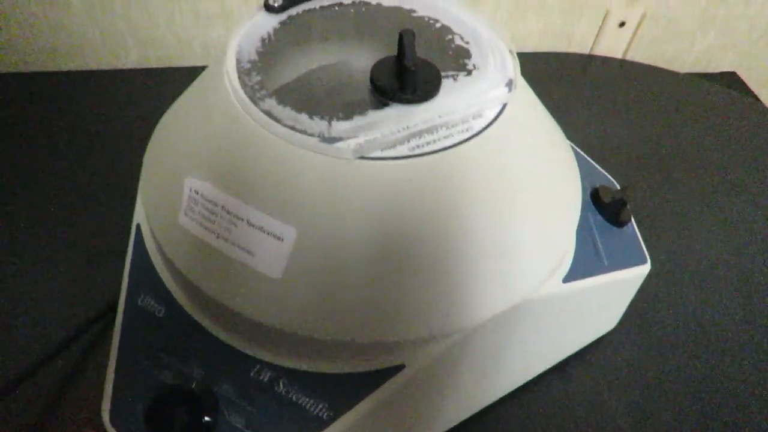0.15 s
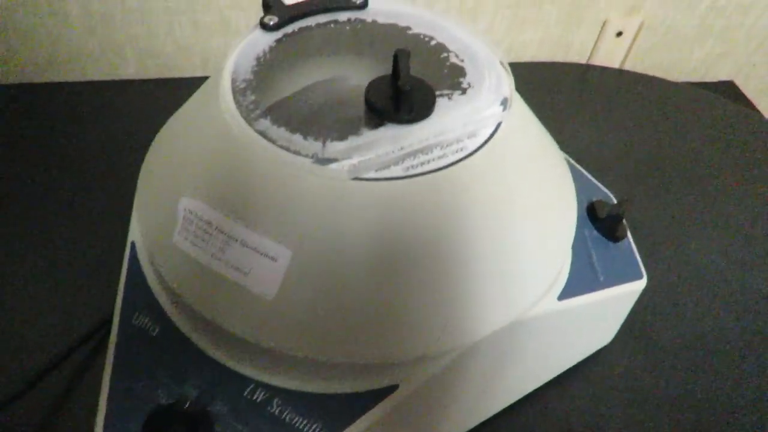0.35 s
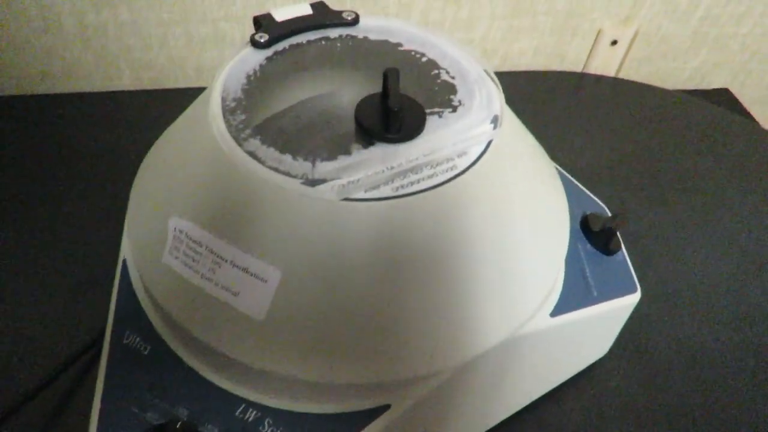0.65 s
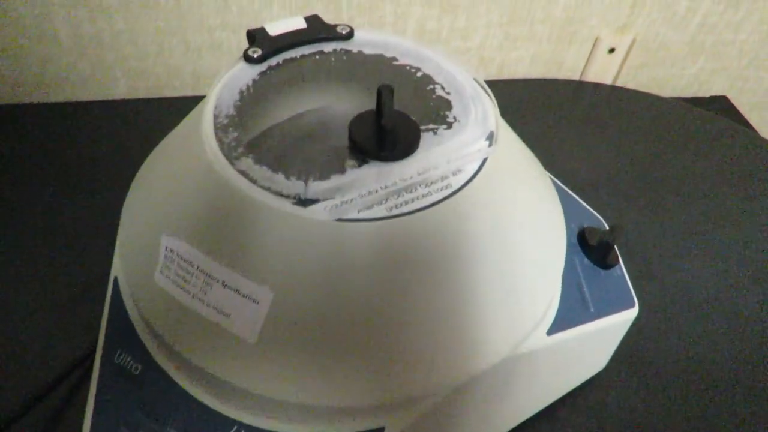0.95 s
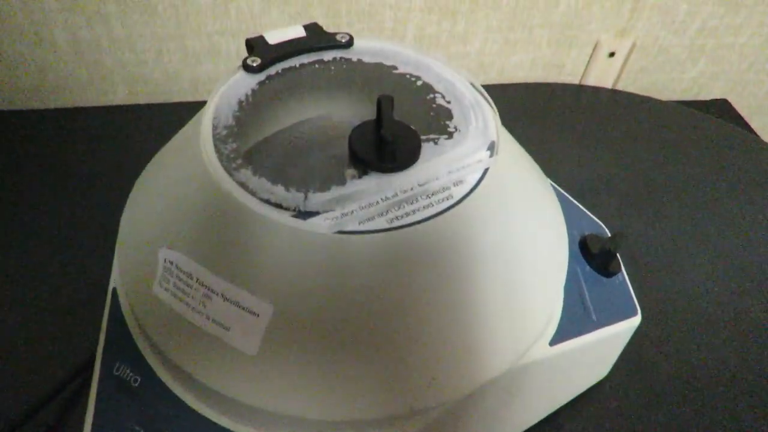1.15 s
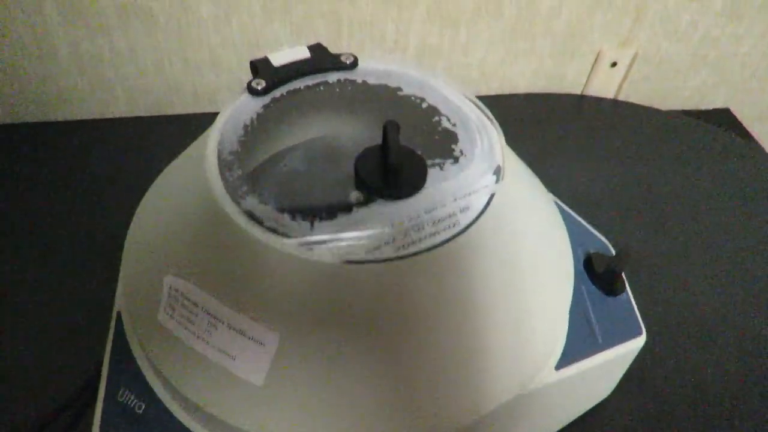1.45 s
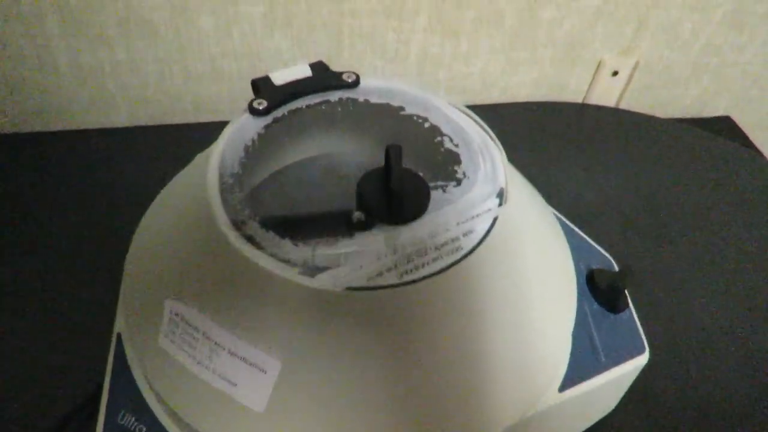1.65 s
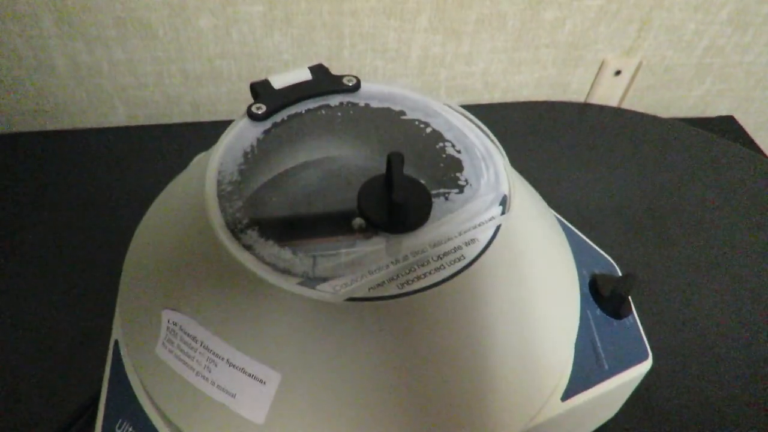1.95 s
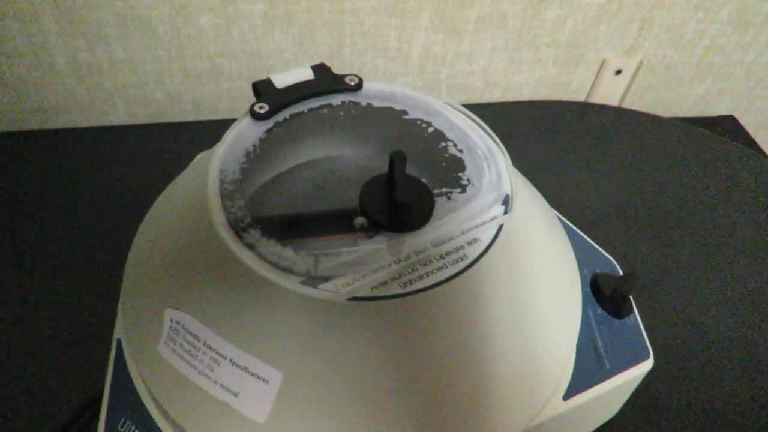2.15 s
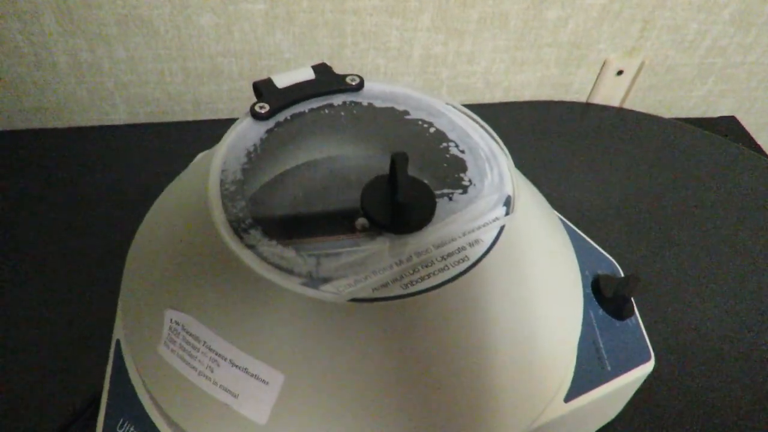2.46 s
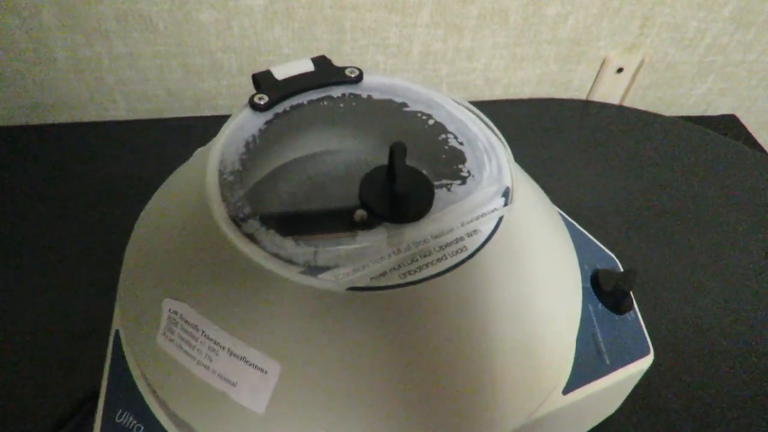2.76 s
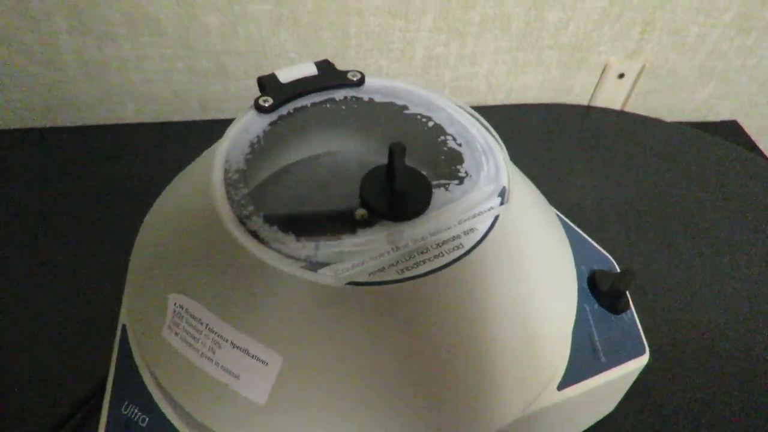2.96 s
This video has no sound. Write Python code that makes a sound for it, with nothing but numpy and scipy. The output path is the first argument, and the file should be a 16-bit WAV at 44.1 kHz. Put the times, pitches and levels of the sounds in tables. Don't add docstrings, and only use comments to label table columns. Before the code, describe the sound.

Steady low motor hum and rushing air from a lab centrifuge, with faint ticks and taps.

```python
import sys
import numpy as np
from scipy import signal
from scipy.fft import rfft, irfft
from scipy.io import wavfile
from scipy.ndimage import uniform_filter1d

SR = 44100
rng = np.random.default_rng(int(sys.argv[2]) if len(sys.argv) > 2 else 0)


def unload_audio(sound):
    columns = np.transpose(np.atleast_2d(sound))
    steps = np.round(np.clip(columns, -1, 1) * 32767)
    wavfile.write(sys.argv[1], SR, steps.astype(np.int16))


def elevation(decibels):
    levels = np.asarray(decibels, float)
    return 10 ** (levels / 20)


N = 136710


def evened(x):
    return x / np.sqrt(np.mean(x ** 2) + 1e-20)


def read_curve(points, hz):
    f, value = np.transpose(points)
    return np.interp(np.log(hz + 1), np.log(f + 1), value)


def band(x, low_hz, high_hz):
    return signal.sosfilt(signal.butter(2, [low_hz, high_hz], "band", fs=SR, output="sos"), x)


def add(mix, start_s, sound):
    part = mix[:, round(start_s * SR):][:, :sound.shape[1]]
    part += sound[:, :part.shape[1]]


def wander(top_hz):
    t = np.arange(0, N + 200, 200) / SR
    slow = 0
    for f in np.geomspace(top_hz / 20, top_hz, 16):
        slow = slow + np.sin(2 * np.pi * (f * t + rng.random())) / np.sqrt(f)
    return np.interp(np.arange(N) / SR, t, evened(slow))


def ringing(modes, spread_db, rise_s):
    t = np.arange(3500) / SR
    hz, db, t60_s = np.transpose(modes)[:, :, None]
    level_luck, pitch_luck, phase_luck = rng.standard_normal((3, len(modes), 1))
    decay = elevation(db + spread_db * level_luck - 60 * t / t60_s) * np.minimum(t / rise_s, 1)
    phase = 2 * np.pi * hz * (1 + 0.0087 * pitch_luck) * t
    mid = (decay * np.sin(phase)).sum(0)
    side = (decay * np.sin(phase + 2 * phase_luck)).sum(0)
    return np.array([mid, side]) / abs(mid).max()


def tone(hz, db, side_db):
    phase = 2 * np.pi * (np.cumsum(hz * np.ones(N)) / SR + rng.random((2, 1)))
    return np.sqrt(2) * elevation(db) * np.sin(phase) * elevation(np.array([[0], [side_db]]))


RUB_START_S, RUB_LENGTH_S, RUB_DB = 2.53, 0.17, -56.5


def finger_rub():
    out = np.zeros((2, N))
    grit = rng.standard_normal((2, 12000))[:, :round(RUB_LENGTH_S * SR)]
    rub = evened(band(grit, 3000, 7600)) * np.hanning(grit.shape[1]) ** .5
    add(out, RUB_START_S, elevation(RUB_DB) * rub)
    return out


# start in seconds, tap peak in dB, knock peak in dB.
LENS_STEPS = [(0.0104, -39, -31), (0.044, -43, -30), (0.0782, -41, -33), (0.1116, -40.5, -31),
              (0.312, -42, -33), (0.3456, -41, -34), (0.416, -49, -32), (0.4774, -42, -27),
              (0.5122, -45, -32), (0.5444, -39.5, -39), (0.7127, -41.5, -30), (0.7444, -40, -32),
              (0.7773, -36, -27), (0.8117, -50, -45), (0.974, -39, -42), (1.4122, -38.5, -29.5),
              (1.5449, -40, -29), (1.6112, -43, -34), (1.6785, -44, -30), (1.945, -38, -29),
              (2.0126, -40, -32), (2.0787, -39.5, -34), (2.546, -40, -31), (2.5794, -53, -41),
              (2.6134, -41, -28), (2.679, -39, -32), (2.8154, -43, -38), (2.8792, -40, -31),
              (2.9466, -39, -27)]
# frequency in Hz, level in dB, t60 in seconds.
TAP_MODES = [(4407, 1, 0.016), (4966, -3, 0.023), (3670, -1.5, 0.0092), (2890, -2.5, 0.009),
             (6300, -11, .008), (12450, -22, 0.011), (13500, -25, .01)]
# frequency in Hz, level in dB, t60 in seconds.
KNOCK_MODES = [(2010, -1, 0.022), (2200, 0, 0.019), (1210, -2, 0.017), (1650, -2.5, 0.013)]
KNOCK_LAG_S, TAP_DB, STEP_RISE_S = 0.00227, 4, 0.00061


def lens_drive():
    out = np.zeros((2, N))
    for start_s, tap_db, knock_db in LENS_STEPS:
        add(out, start_s, elevation(tap_db + TAP_DB) * ringing(TAP_MODES, 2.5, STEP_RISE_S))
        add(out, start_s + KNOCK_LAG_S, elevation(knock_db) * ringing(KNOCK_MODES, 2.0, STEP_RISE_S))
    return out


# start in seconds, peak in dB.
TIMER_BEATS = [(0.1685, -46), (0.4425, -41.5), (0.6777, -44), (0.9508, -44), (1.1862, -46), (1.4596, -42),
               (1.6945, -45.5), (1.967, -42), (2.205, -45.5), (2.4768, -38.5), (2.7182, -44.5),
               (2.986, -39.5)]
# frequency in Hz, level in dB, t60 in seconds.
TOCK_MODES = [(2900, -13, 0.018), (4580, 5, 0.017), (5270, 4.5, 0.02), (6450, -1, 0.028), (7200, -12, .025),
              (8000, -12, 0.022), (9370, -9.5, 0.053), (10200, -16, 0.023), (12900, -25, .03)]
# frequency in Hz, level in dB, t60 in seconds.
TICK_MODES = [(2600, -14, 0.015), (3680, 3, 0.025), (4355, 0.5, 0.057), (5170, 5, 0.024),
              (6640, -4.5, .025), (7150, -13, .025), (7930, -13, 0.065), (8730, -17, 0.039),
              (10040, -19, 0.048), (10400, -24, 0.022), (13400, -25, .03)]
RATTLE_S, RATTLE_PER_S = 0.019, 2500
BEAT_DB, BEAT_SPREAD_DB = 5, 1
HISS_DB, HISS_S = -7, .016


def timer():
    out, t = np.zeros((2, N)), np.arange(1500) / SR
    fade = np.cos(t / t[-1] * np.pi / 2)
    for k, (start_s, db) in enumerate(TIMER_BEATS):
        contacts = rng.random(1500) < RATTLE_PER_S / SR
        hits = contacts * rng.standard_normal(1500) * np.exp(-t / RATTLE_S)
        hits[0] = 1
        case = ringing((TOCK_MODES, TICK_MODES)[k % 2], BEAT_SPREAD_DB, 0.00011)
        beat = signal.fftconvolve(case, hits[None])[:, :1500]
        beat = 0.36 * beat / np.sqrt(np.mean(beat[0, :600] ** 2))
        hiss = band(rng.standard_normal((2, 1500)), 2200, 9500) * np.exp(-t / HISS_S)
        add(out, start_s, elevation(db + BEAT_DB) * (beat + elevation(HISS_DB) * hiss) * fade)
    return out


# frequency in Hz, density in dB per Hz.
AIR_SPECTRUM = [(76, -12.5), (130, -5.5), (220, -11), (750, -20.5), (2110, -28), (6520, -46.5),
                (10100, -59), (14800, -68.5)]
# frequency in Hz, width in Hz, lift in dB.
BOWL_RESONANCES = [(63.3, 16, 9), (92, 19.4, -8), (147.8, 24, 5), (222, 19, -4), (258, 40, 5), (320, 26, 3),
                   (423, 31, 5), (484, 37, 6), (563.6, 26, 5), (667, 21, -4), (786, 67, 7.5), (1114, 71, 5),
                   (2200, 410, 1), (4150, 580, 2.5)]
AIR_DB, AIR_LOW_HZ, PATCH_DB, SWELL_DB = -31, 53, 0.74, 0.2
BOWL_SIDE = 0.74
NEARING_DB_PER_S = .5


def bowl_air():
    frames, hz = N // 1024 + 6, np.fft.rfftfreq(4096, 1 / SR)
    real, imag = rng.standard_normal((2, 2, frames, 2049)).transpose(0, 1, 3, 2)
    patches = uniform_filter1d(rng.standard_normal((frames, 2049)).T, 40, 0)
    patches = evened(uniform_filter1d(patches, 4, 1))
    lift = sum(db / (1 + (2 * (hz - f) / width_hz) ** 2) for f, width_hz, db in BOWL_RESONANCES)
    colour_db = read_curve(AIR_SPECTRUM, hz) + np.array([[1], [BOWL_SIDE]]) * lift
    gain = elevation(colour_db) / np.sqrt(1 + (AIR_LOW_HZ / (hz + 1)) ** 10)
    spectrum = (real + 1j * imag) * gain[:, :, None] * elevation(PATCH_DB * patches)
    wash = signal.istft(spectrum, nperseg=4096, noverlap=3072)[1][:, :N]
    nearing_db = NEARING_DB_PER_S * (np.arange(N) - N / 2) / SR
    return elevation(AIR_DB + nearing_db + SWELL_DB * wander(2.5)) * evened(wash)


# time in seconds, frequency in Hz.
BEARING_SPEED = [
    (0, 2376),
    (.45, 2366),
    (1.1, 2364.5),
    (1.45, 2356),
    (2.55, 2356),
    (2.8, 2366),
    (2.95, 2371),
    (3.1, 2373),
]
# time in seconds, share 0 to 1.
SETTLING = [
    (0, 0),
    (1.05, 0.06),
    (1.25, 0.75),
    (1.75, 0.92),
    (2.68, 1),
    (2.82, 0.43),
    (3.1, 0.56),
]
WHINE_HZ = [1959.7, 2056.5, 2136.1, 2197.5, 2276.8, 2355.8, 2514.5, 2593.9, 2674, 2751.9, 2911, 2990.3,
            3148.7]
# slow level in dB rms, fast level in dB rms.
WHINE_LEVELS = [(-62, -64), (-62, -54), (-58.5, -57), (-92, -52), (-43, -63), (-56, -58), (-69, -68),
                (-79, -63), (-70, -60.5), (-61.5, -61.5), (-65, -78), (-61.5, -61), (-63.5, -67)]
SLOW_HZ = 2356
WHINE_SIDE_DB, WHINE_WOBBLE_DB, WHINE_DRIFT = -5, 0.66, 0.00022


def bearing():
    t, out = np.arange(N) / SR, 0
    speed_hz = uniform_filter1d(np.interp(t, *np.transpose(BEARING_SPEED)), 3000)
    settled = np.clip(np.interp(t, *np.transpose(SETTLING)), 0, 1)
    for hz, (slow_db, fast_db) in zip(WHINE_HZ, WHINE_LEVELS):
        pitch_hz = hz * speed_hz / SLOW_HZ * (1 + WHINE_DRIFT * wander(12.63))
        level_db = fast_db + (slow_db - fast_db) * settled + WHINE_WOBBLE_DB * wander(7.3)
        out = out + tone(pitch_hz, level_db, WHINE_SIDE_DB)
    return out


HUM_HZ = [116.2, 58.1, 73.2, 145.8, 248.1, 480.3, 1079.4]
# level in dB rms, wobble in dB, wobble rate per second.
HUM_LEVELS = [(-29.5, .5, 9.), (-45, 3.5, 16.), (-50, 3., 12.), (-47, 3., 14.), (-51, 3., 14.),
              (-55, 2.5, 14.), (-58, 2.5, 9.)]
HUM_SIDE_DB, HUM_DRIFT = -7.5, 0.0011


def rotor():
    out = 0
    for hz, (db, wobble_db, wobble_per_s) in zip(HUM_HZ, HUM_LEVELS):
        pitch_hz = hz * (1 + HUM_DRIFT * wander(3.68))
        out = out + tone(pitch_hz, db + wobble_db * wander(wobble_per_s), HUM_SIDE_DB)
    return out


# frequency in Hz, level in dB.
PORT_DIFFERENCE = [(60, -38), (110, -28), (190, -17), (330, -11.5), (1010, -14.5), (7600, -9), (10000, 6),
                   (14500, 3)]


def scene():
    mid, side = finger_rub() + lens_drive() + timer() + bowl_air() + bearing() + rotor()
    side = irfft(rfft(side) * elevation(read_curve(PORT_DIFFERENCE, np.fft.rfftfreq(N, 1 / SR))), N)
    return np.array([mid + side, mid - side])


def low_pass(x):
    return signal.sosfilt(signal.butter(12, 15200, fs=SR, output="sos"), x)


def record(dry):
    dull = signal.sosfilt(signal.butter(6, 13600, fs=SR, output="sos"), dry)
    return low_pass(dull)


dry = scene()
out = record(dry)
unload_audio(out)
```